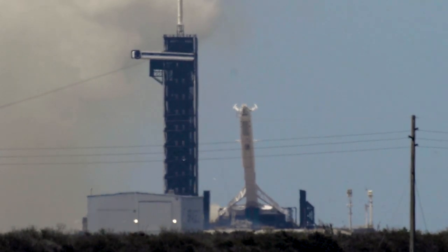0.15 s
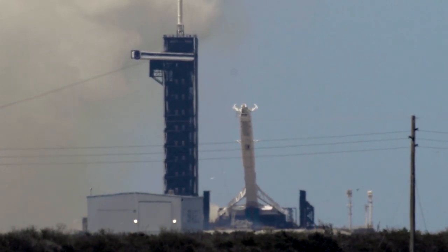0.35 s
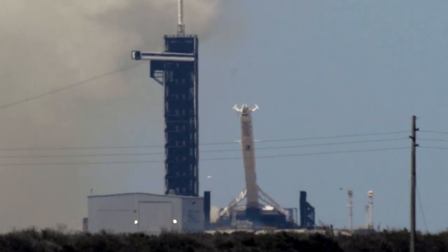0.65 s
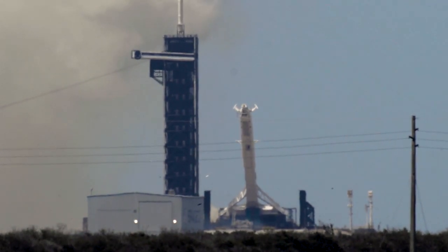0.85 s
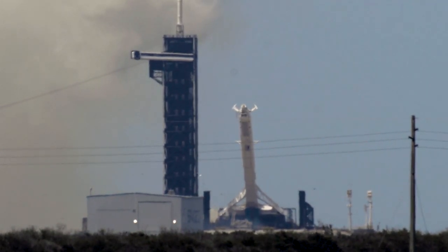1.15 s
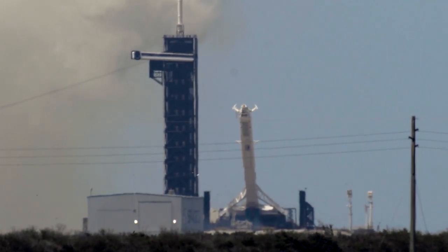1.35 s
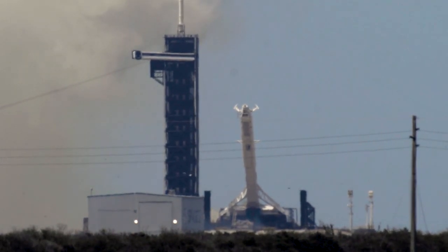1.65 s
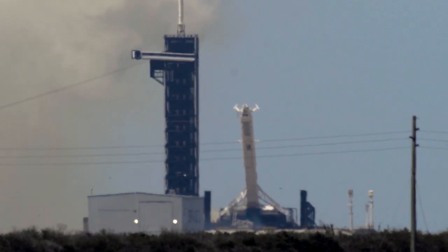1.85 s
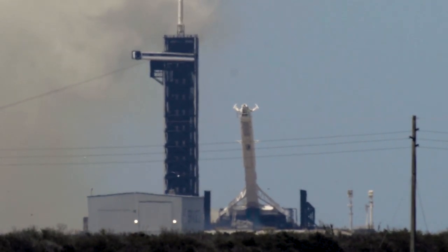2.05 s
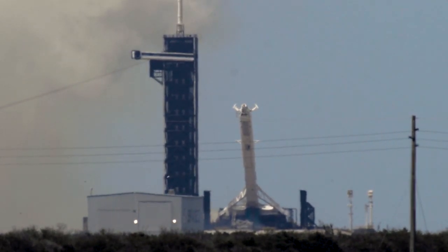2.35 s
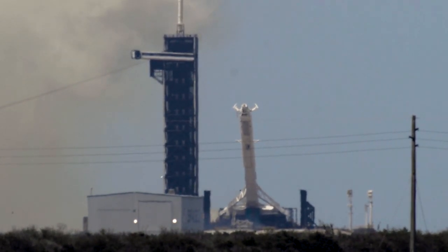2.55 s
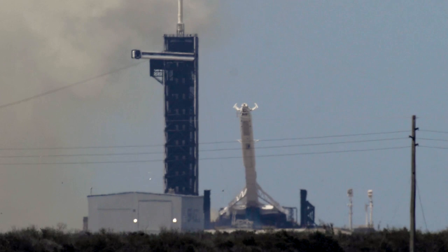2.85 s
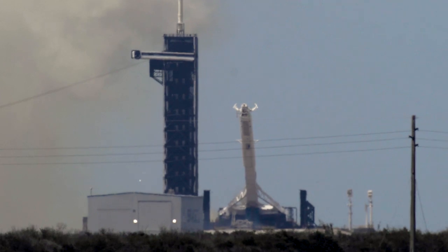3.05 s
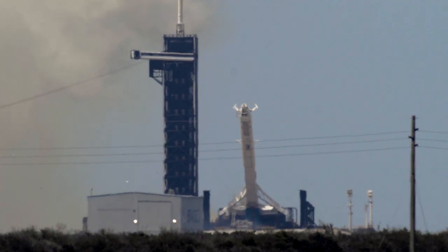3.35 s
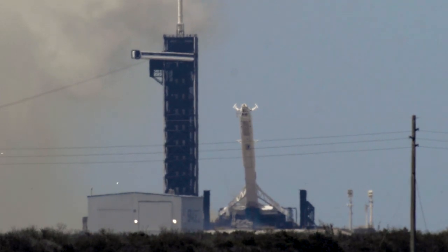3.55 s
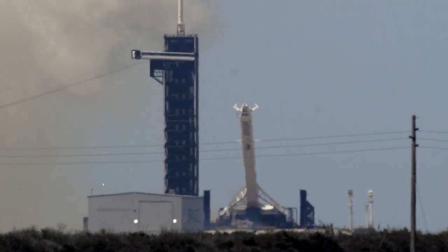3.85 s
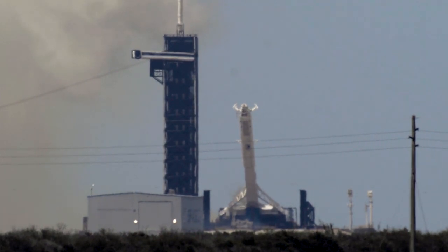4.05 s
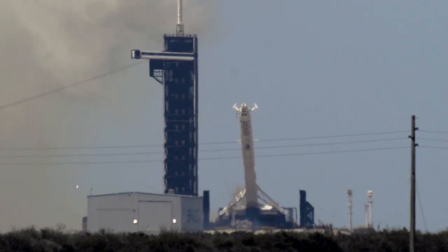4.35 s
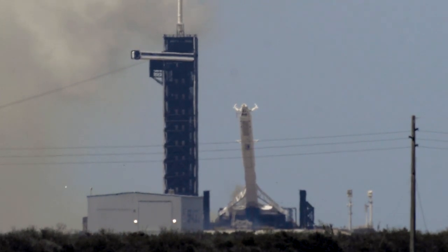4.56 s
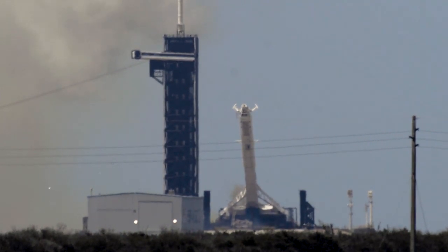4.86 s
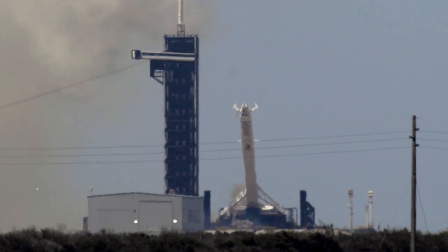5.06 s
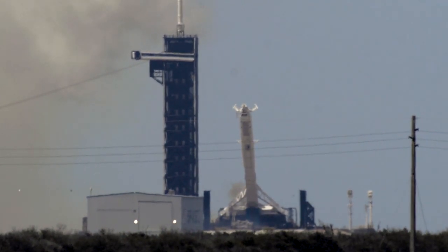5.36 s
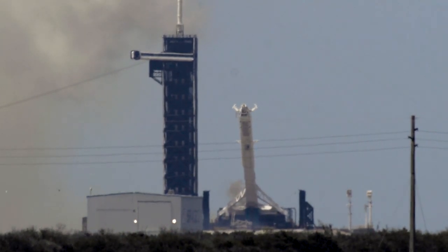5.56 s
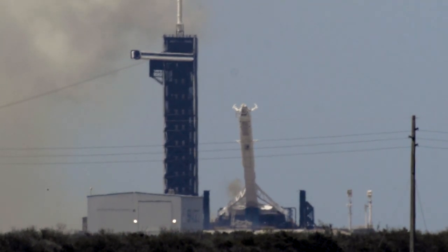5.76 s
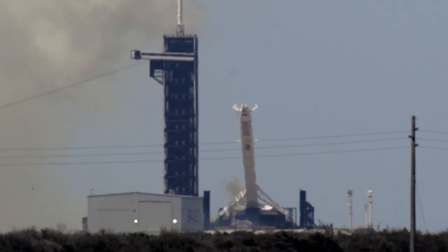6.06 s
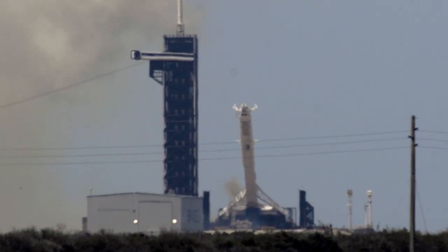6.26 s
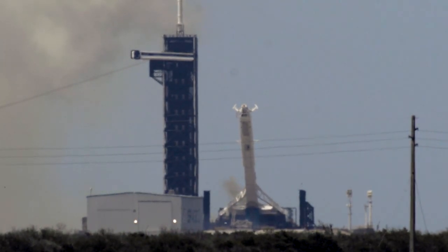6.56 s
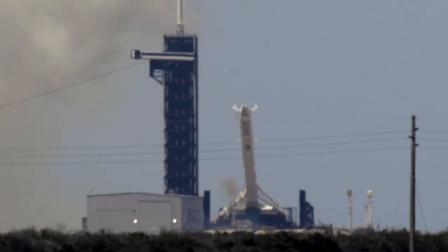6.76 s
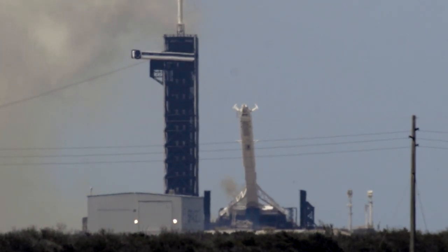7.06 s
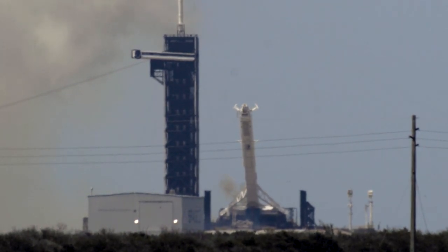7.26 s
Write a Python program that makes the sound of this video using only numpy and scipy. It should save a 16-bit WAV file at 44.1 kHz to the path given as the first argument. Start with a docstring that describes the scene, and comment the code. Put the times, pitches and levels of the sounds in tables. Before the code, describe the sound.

Across flat scrubland, a distant microphone picks up rocket noise already in full flow: low turbulent rumble beneath popping, ripping crackle, many jolts each second. It thickens early, recedes in the middle into muffled thuds, then returns with tight, loud cracks and gritty fizz, still going at the cut. A few very faint high chips hide underneath.

```python
"""Rocket climbing away, heard from miles off

A rocket leaves its pad across flat scrubland. The jet's steepened pressure waves arrive as relaxing
jumps: steep ones crack, rounded ones thud. Each is echoed by the ground and by filtered-noise scatter
from the brush. Noise rumble and roar, a patter of weak shocks, fizz and a few high chips fill in."""
import sys
import numpy as np
from scipy import signal
from scipy.fft import rfft, irfft, next_fast_len
from scipy.io import wavfile

SR = 44100
rng = np.random.default_rng(int(sys.argv[2]) if len(sys.argv) > 2 else 0)


def wav_record(signal):
    """Record a signal, one row per channel, as 16-bit PCM in the file named by sys.argv[1]."""
    frames = np.transpose(np.atleast_2d(signal))
    bounded = np.clip(frames, -1, 1)
    # unit amplitude maps onto the largest positive 16-bit level
    quanta = np.round(bounded * 32767).astype(np.int16)
    wavfile.write(sys.argv[1], SR, quanta)


N = 326763

# Shocks that stand out as cracks and thuds. Each row: start in seconds, front level in dB before the
# mix trim, rise time in ms, swing level in dB, time of deepest suction after the front in ms.
CRACKS = [(0.0189, -11, 0.4, -23, 5.8), (0.073, -6, 0.16, -17.5, 7.4), (0.139, -8.5, 0.29, -25, 7.8),
          (0.1825, -17.5, 0.31, -22.5, 6.2), (0.2202, -22, 0.43, -32, 7.2), (0.2662, -20, 0.39, -26.5, 8.2),
          (0.281, -15, 0.43, -26, 6.5), (0.339, -9.5, 0.38, -24, 10.6), (0.382, -13.5, 0.2, -18.5, 5.7),
          (0.4097, -9.5, 0.36, -23.5, 13.3), (0.43, -14, 0.21, -19.5, 7.7), (0.5177, -10.5, 0.28, -20, 9.7),
          (0.5646, -10.5, 0.25, -20, 8.8), (0.609, -8.5, 0.35, -27, 9.4), (0.6827, -15.5, 0.24, -23, 7.6),
          (0.7265, -10.5, 0.28, -24, 8.7), (0.8003, -11, 0.36, -27, 8.8), (0.8554, -14.5, 0.29, -26.5, 8.2),
          (0.874, -13, 0.44, -23, 7.7), (0.9, -11.5, 0.37, -26.5, 7.7), (0.9287, -12, 0.33, -22, 9.2),
          (0.9608, -16, 0.36, -20.5, 6.6), (1.017, -9, 0.21, -21.5, 6.9), (1.0553, -30, 0.31, -24, 8.9),
          (1.1093, -14, 0.29, -21, 7.4), (1.1308, -12, 0.22, -20, 6.2), (1.16, -8, 0.54, -21, 6.5),
          (1.1943, -7.5, 0.2, -20, 7), (1.2371, -16.5, 0.28, -25, 6.8), (1.265, -13, 0.38, -30, 11),
          (1.2822, -13.5, 0.36, -21, 6.4), (1.3264, -10, 0.34, -20, 7.4), (1.3568, -20, 0.64, -19.5, 8.4),
          (1.389, -13, 0.22, -19, 7.1), (1.4375, -7.5, 0.16, -16.5, 8.2), (1.462, -12, 0.29, -18.5, 6.3),
          (1.5074, -12.5, 0.28, -18, 8.9), (1.5663, -6.5, 0.13, -15, 9.2), (1.614, -8, 0.25, -17.5, 8.5),
          (1.6426, -8, 0.19, -16.5, 8.7), (1.6821, -16, 0.23, -23, 11), (1.749, -3.5, 0.08, -16.5, 6.2),
          (1.7901, -3, 0.34, -21.5, 11.4), (1.8326, -9.5, 0.44, -23, 21), (1.867, -10.5, 0.22, -17, 8.7),
          (1.883, -18.5, 0.26, -27, 7.6), (1.913, -6.5, 0.25, -17, 7.9), (1.9558, -8.5, 0.25, -23.5, 6.6),
          (2.0172, -11.5, 0.32, -20.5, 8), (2.0319, -18.5, 0.27, -19.5, 7), (2.077, -10.5, 0.27, -16, 6.9),
          (2.1174, -12.5, 0.27, -25, 13.6), (2.1959, -6, 0.22, -14.5, 6.9), (2.252, -11.5, 0.27, -16, 7.5),
          (2.2961, -10.5, 0.44, -25, 6.3), (2.3279, -6.5, 0.16, -16.5, 6.2), (2.3476, -12, 0.34, -20, 8.9),
          (2.39, -25, 0.39, -23.5, 9.7), (2.4135, -6.5, 0.15, -17.5, 6), (2.4229, -10.5, 0.25, -17.5, 6.9),
          (2.461, -19, 0.22, -27, 7.9), (2.4836, -10, 0.35, -26.5, 10.5), (2.5087, -7.5, 0.25, -23.5, 7),
          (2.55, -10, 0.35, -25.5, 6.5), (2.5962, -13, 0.26, -32, 4.3), (2.6036, -8, 0.37, -23.5, 8.2),
          (2.631, -13.5, 0.4, -24, 6.6), (2.6506, -11.5, 0.45, -29, 7.7), (2.699, -6.5, 0.19, -15.5, 7.1),
          (2.7353, -13, 0.28, -20, 9.6), (2.786, -7, 0.24, -18, 8.9), (2.812, -8, 0.28, -21, 9.6),
          (2.872, -10, 0.37, -20, 11.8), (2.9266, -3.5, 0.13, -17, 7.1), (2.989, -10.5, 0.37, -27, 7.5),
          (3.033, -10.5, 0.26, -32, 6.2), (3.0845, -11.5, 0.23, -22, 9), (3.1274, -12, 0.28, -23, 7.9),
          (3.1662, -5.5, 0.16, -20.5, 7.9), (3.2206, -13, 0.24, -28.5, 6.3), (3.2416, -8.5, 0.58, -24.5, 7),
          (3.262, -16, 0.41, -31.5, 5.1), (3.2905, -9, 0.23, -20.5, 8.5), (3.325, -10.5, 0.25, -29, 11),
          (3.3453, -10, 0.31, -27, 8), (3.3728, -8.5, 0.25, -24, 11.5), (3.485, -8.5, 0.42, -25, 7.5),
          (3.5303, -7, 0.32, -20.5, 9), (3.5715, -11, 0.17, -20.5, 6.2), (3.6094, -14, 0.27, -27, 7.6),
          (3.6298, -11, 0.37, -24, 6.3), (3.6628, -12, 0.17, -23.5, 6.8), (3.7061, -10.0, 0.12, -19.5, 6.1),
          (3.7345, -13, 0.28, -21.5, 8.5), (3.772, -22.5, 0.25, -24, 9), (3.8156, -9, 0.1, -15, 6),
          (3.8607, -13, 0.16, -22, 9.1), (3.9189, -12, 0.21, -19, 6), (3.954, -15, 0.16, -24, 5),
          (4.0062, -13, 0.2, -22, 9.9), (4.046, -21, 0.27, -32, 8.4), (4.1215, -12.5, 0.23, -24.5, 12),
          (4.1636, -11.5, 0.28, -24.5, 8), (4.1759, -10.5, 0.19, -21, 6.1), (4.2109, -12.5, 0.25, -22, 7.3),
          (4.2758, -14, 0.26, -22.5, 6.8), (4.3415, -13.5, 0.2, -23.5, 5.5),
          (4.3874, -8.5, 0.2, -23.5, 8.7), (4.5008, -20, 0.22, -27, 7.1), (4.5267, -15.5, 0.6, -23.5, 6.8),
          (4.5859, -10.5, 0.57, -30, 15), (4.6125, -14, 0.36, -24, 6.8), (4.6399, -12, 0.21, -24.5, 7.8),
          (4.65, -19.5, 0.32, -27, 7), (4.7835, -17, 0.36, -27, 9.2), (4.8381, -16.5, 0.39, -23, 8.5),
          (4.8768, -12.5, 0.43, -28, 9.6), (4.9551, -16, 0.44, -31.5, 6.3), (4.993, -12.5, 0.39, -30, 13),
          (5.036, -13.5, 0.46, -34, 8.3), (5.083, -16.5, 0.35, -24, 6.7), (5.1861, -10, 0.74, -30, 14.3),
          (5.379, -12, 0.56, -27.5, 9), (5.4305, -17.5, 0.42, -31, 8.9), (5.4609, -13.5, 0.3, -23, 9.5),
          (5.4976, -12.5, 0.24, -22.5, 8.2), (5.5616, -19, 0.4, -24.5, 12.7),
          (5.646, -15, 0.28, -26.5, 9.1), (5.7074, -18.5, 0.34, -32, 7.5), (5.727, -16, 0.32, -28, 10.2),
          (5.7575, -16.5, 0.39, -32, 9.3), (5.768, -14, 0.36, -26, 7.2), (5.7928, -15, 0.43, -37, 7.5),
          (5.8383, -14, 0.26, -28, 8.8), (5.859, -13, 0.14, -26.5, 6.5), (5.8791, -12, 0.2, -30, 11.5),
          (5.9297, -12, 0.14, -31, 11.7), (5.965, -11.5, 0.14, -23.5, 7.3), (6.0124, -14, 0.28, -36.5, 5.3),
          (6.0355, -19.5, 0.3, -37, 6), (6.0949, -12.5, 0.14, -33.5, 7), (6.143, -12, 0.24, -30.5, 12),
          (6.2169, -11.5, 0.19, -22, 12.4), (6.277, -12.5, 0.25, -24.5, 10.5),
          (6.3205, -16, 0.26, -26.5, 9), (6.3509, -8, 0.45, -32, 7.1), (6.3764, -13.5, 0.29, -24, 9.6),
          (6.4025, -16, 0.45, -25, 10.7), (6.441, -17, 0.3, -24.5, 9.5), (6.468, -15, 0.23, -19.5, 7.5),
          (6.5025, -16, 0.28, -35, 3.7), (6.532, -13, 0.17, -28.5, 6), (6.5469, -5, 0.49, -33, 8.5),
          (6.578, -9.5, 0.15, -21, 7.6), (6.6087, -8.5, 0.15, -25, 5.4), (6.6194, -4.5, 0.14, -25, 6.7),
          (6.6507, -10, 0.33, -24, 7.8), (6.663, -8, 0.13, -20, 5.5), (6.6787, -12, 0.11, -25, 6.4),
          (6.7, -5, 0.3, -24, 8.7), (6.737, -11, 0.097, -25, 3.9), (6.764, -12, 0.28, -30, 4.2),
          (6.7795, -4, 0.14, -25.5, 7.2), (6.8034, -12, 0.12, -26, 9.1), (6.8316, -1.5, 0.17, -22, 7.8),
          (6.8667, -15, 0.094, -29, 7.1), (6.8813, -9, 0.12, -26, 4.9), (6.8887, -7.5, 0.16, -35, 6.6),
          (6.922, -5.5, 0.29, -38, 13), (6.948, -4, 0.13, -28, 6.6), (6.966, -2.5, 0.3, -28, 11),
          (7.006, -3, 0.16, -24.5, 7.9), (7.068, -14, 0.23, -28, 4.9), (7.1329, 1, 0.16, -22.5, 7.2),
          (7.1844, -7.5, 0.29, -33, 1.3), (7.229, -11, 0.28, -31, 4.3), (7.2476, -12.5, 0.36, -24, 10.4),
          (7.284, -4, 0.27, -27.5, 5.1), (7.334, -12, 0.41, -29, 9.7)]
# Level of the jet noise. Each row: time in seconds, rumble in dB, roar in dB, both before trims.
JET_LEVELS = [(0.0, -24.5, -32.5), (0.398, -30, -41), (0.7, -27, -42), (1.05, -25.5, -41),
              (1.3, -28, -43.5), (1.5, -27, -39), (2.101, -28, -41.5), (2.55, -27, -40),
              (3.2, -29.5, -42.5), (3.8, -29.5, -40), (4.2, -30, -41.5), (4.75, -35.5, -45),
              (5.301, -32, -46), (5.7, -35.5, -45), (6.1, -30.5, -45), (6.4, -30.5, -42), (6.799, -30, -39),
              (7.41, -30.5, -40)]
# Spectrum of sizzle and wisps. Each row: frequency in Hz, relative density in dB per Hz.
FIZZ_SPECTRUM = [(1100, -20), (2400, -2), (4000, -2.5), (5200, -6.5), (6100, -24.5), (9800, -30.5),
                 (11500, -46)]


def from_db(db):
    """Decibels to gain."""
    return 10 ** (np.asarray(db) / 20)


def rms_one(x):
    """Scale to unit rms."""
    return x / np.sqrt(np.mean(x ** 2) + 1e-20)


def in_time(rows):
    """Each column of a curve, interpolated at every sample."""
    s, *columns = np.transpose(rows)
    return [np.interp(np.arange(N) / SR, s, column) for column in columns]


def noise(spectrum, size):
    """Gaussian noise of rms 1, its spectrum interpolated over log frequency."""
    hz, db = np.transpose(spectrum)
    bins_hz = np.maximum(np.fft.rfftfreq(size, 1 / SR), 1)
    gain = from_db(np.interp(np.log(bins_hz), np.log(hz), db))
    return rms_one(irfft(rfft(rng.standard_normal(size)) * gain, size))


def long_noise(spectrum):
    """Shaped noise for the whole scene."""
    return noise(spectrum, next_fast_len(N))[:N]


def ragged(size, spread_db, grain_s):
    """A gain of rms 1 that moves to a new random level at each grain."""
    step = max(grain_s * SR, 2)
    db = spread_db * np.clip(rng.standard_normal(size // 2 + 2), -2, 2)
    return rms_one(from_db(np.interp(np.arange(size) / step, np.arange(len(db)), db)))


def add(out, s, sound):
    """Mix a sound in at time s."""
    start = int(np.clip(round(s * SR), 0, N - 1))
    out[start:start + len(sound)] += sound[:N - start]


def bell(hz, width_hz, db):
    """Coefficients of one resonant peak or dip."""
    gain = from_db(db / 2)
    half = np.tan(np.pi * width_hz / SR)
    turn = -2 * np.cos(2 * np.pi * hz / SR)
    return [1 + half * gain, turn, 1 - half * gain], [1 + half / gain, turn, 1 - half / gain]


def sliding_bell(x, hz, db, breadth, block=256):
    """A peak or dip whose pitch and height move, updated block by block."""
    out, state = np.zeros(N), np.zeros(2)
    for i in range(0, N, block):
        b, a = bell(hz[i], breadth * hz[i], db[i])
        out[i:i + block], state = signal.lfilter(b, a, x[i:i + block], zi=state)
    return out


def air_hiss(level_db=-101.5):
    """Faint, even white noise."""
    return from_db(level_db) * rng.standard_normal(N)


def chips(attack_s=0.0039, t60_s=0.089):
    """Thin high chips, perhaps of a small bird: narrow, airy noise ticks that decay exponentially."""
    # Each row: start in seconds, pitch in Hz, level in dB.
    chip_rows = [(0.454, 5050, -68.5), (0.889, 5070, -68.5), (4.184, 5100, -76), (5.160, 4620, -86)]
    # Each row: multiple of the pitch, relative density in dB per Hz.
    chip_spectrum = [(.5, -39), (.7, -5), (.88, -10.5), (1, -3), (1.14, -10.5), (1.4, -25.5), (1.8, -16),
                     (2.15, -32), (2.5, -38)]
    t = np.arange(SR // 8) / SR
    shape = (1 - np.exp(-t / attack_s)) ** 2 * from_db(-60 * t / t60_s)
    shape = shape / shape.max()
    out = np.zeros(N)
    for s, pitch_hz, db in chip_rows:
        spectrum = [(multiple * pitch_hz, density_db) for multiple, density_db in chip_spectrum]
        add(out, s, from_db(db) * shape * noise(spectrum, len(t)))
    return out


def wisps():
    """Grainy swells of treble noise, from brief wisps to long spells of tearing."""
    # Each row: centre in seconds, width in seconds, peak level in dB.
    wisp_rows = [(0.040, 0.012, -74), (1.649, 0.36, -72), (3.8, 0.2, -82.5), (6.80, 0.13, -77.5),
                 (7.110, 0.013, -66), (7.239, 0.013, -57)]
    level = np.zeros(N)
    for s, width_s, db in wisp_rows:
        widths = np.clip((np.arange(N) / SR - s) / width_s * 2, -20, 20)
        level = np.hypot(level, from_db(db) / np.cosh(widths))
    return level * ragged(N, spread_db=9.0, grain_s=0.0044) * long_noise(FIZZ_SPECTRUM)


def rumble(level_db, trim_db=-6):
    """The jet's low turbulence: shaped noise of lumpy level."""
    # Each row: frequency in Hz, relative density in dB per Hz.
    rumble_spectrum = [(12, -12.5), (25, -1.5), (45, 9), (70, 1), (100, 5.5), (140, -15), (220, -41),
                       (500, -75.5)]
    return from_db(level_db + trim_db) * ragged(N, spread_db=3.0, grain_s=0.041) * long_noise(rumble_spectrum)


def roar(level_db, trim_db=-0.5):
    """The merged roar of the jet: shaped noise of lumpy level."""
    # Each row: frequency in Hz, relative density in dB per Hz.
    roar_spectrum = [(60, -17.5), (130, 15), (190, -2.5), (300, -9), (500, -14.5), (800, -23),
                     (1200, -31.5), (2000, -41), (4000, -57.5), (8000, -70.5)]
    return from_db(level_db + trim_db) * ragged(N, spread_db=2.0, grain_s=0.018) * long_noise(roar_spectrum)


def front(t, rise_ms, relax_ms=0.56, soften=0.34, round_ms=0.072):
    """A jump of pressure that relaxes at once; absorption rounds its edge, weak fronts the most."""
    ms = t * 1000
    wave = np.exp(-ms / relax_ms)
    extra_lag_ms = soften * rise_ms * np.tanh((rise_ms / round_ms) ** 2)
    for lag_ms in (0.88 * rise_ms, 0.88 * rise_ms, extra_lag_ms):
        r = np.exp(-ms[1] / max(lag_ms, ms[1] / 10))
        wave = signal.lfilter([1 - r], [1, -r], wave)
    return wave


def swing(t, suction_ms, onset_ms=0.81):
    """Push, suction and a faint long trailing suction behind a front, stretched to the shock's length."""
    # Push, suction, trailing suction. Each row: time after the front in ms, half width in ms (both
    # before stretching), relative height.
    swing_lobes = [(2.27, 2.15, 0.77), (7.73, 2.99, -1.37), (21, 6.5, -0.16)]
    ms = t * 1000 * swing_lobes[1][0] / max(suction_ms, 2)
    lobes = sum(height * np.exp(-((ms - at_ms) / width_ms) ** 2) for at_ms, width_ms, height in swing_lobes)
    return lobes * (1 - np.exp(-(ms / onset_ms) ** 2))


def scatter(t, near_db=-8.0, near_t60_s=0.027, near_build_s=0.003,
            far_db=-15, far_t60_s=0.28, far_build_s=0.0019):
    """A new noise echo pattern per call: a spray from nearby brush, then a ragged wash from the field."""
    # Each row: frequency in Hz, relative density in dB per Hz.
    brush_spectrum = [(60, -16.5), (200, -4.5), (500, 3.5), (1200, 2.5), (2500, 8.5), (4800, 7), (6200, -7),
                      (9500, -2.5), (15000, -18.5)]
    near = from_db(-60 * t / near_t60_s) * (1 - np.exp(-t / near_build_s)) ** 2
    far = from_db(-60 * t / far_t60_s) * (1 - np.exp(-t / far_build_s))
    shape = np.hypot(from_db(near_db) * rms_one(near), from_db(far_db) * rms_one(far))
    grit = ragged(len(t), spread_db=5.5, grain_s=0.002)
    return shape * grit * noise(brush_spectrum, len(t)) / np.sqrt(len(t))


def weak_shocks(per_s=55, spread_db=3.0, rise_ms=0.55, low_hz=130):
    """Small rounded shocks arriving at random, trailed by scattered echoes; rms 1."""
    t = np.arange(SR // 8) / SR
    sizes = from_db(spread_db * np.clip(rng.standard_normal(N), -2, 1))
    arrivals = sizes * (rng.random(N) < per_s / SR)
    waves = signal.fftconvolve(arrivals, front(t, rise_ms, soften=0.14))[:N]
    waves = waves + signal.fftconvolve(waves, scatter(t))[:N]
    high_pass = signal.butter(2, low_hz, "high", fs=SR, output="sos")
    return rms_one(signal.sosfilt(high_pass, waves))


def lesser_shocks(per_s=23.4, jitter=0.22, over_roar_db=22.5, spread_db=3.5, ref_rise_ms=0.52,
                  ref_db=-19, rise_doubling_db=17.5, swing_follows=0.18, swing_trim_db=-1.5):
    """Rows like those of CRACKS, filling the gaps between them; levels follow the roar.

    Rise time doubles for every rise_doubling_db below ref_db; jitter is a share of the interval."""
    crack_s, crack_db, _, crack_swing_db, crack_suction_ms = np.transpose(CRACKS)
    marks = [0, *crack_s, N / SR]
    times = []
    for start, end in zip(marks, marks[1:]):
        intervals = max(round((end - start) * per_s), 1)
        times.extend(np.linspace(start, end, intervals + 1)[1:-1])
    late, size = np.clip(rng.standard_normal((len(times), 2)), -2, 2).T
    s = np.array(times) + late * jitter / per_s
    jet_s, _, roar_db = np.transpose(JET_LEVELS)
    db = np.interp(s, jet_s, roar_db) + over_roar_db + spread_db * size
    rise_ms = ref_rise_ms * 2 ** ((ref_db - db) / rise_doubling_db)
    # stronger fronts pull a deeper swing: swing_follows is dB of swing per dB of front
    base_swing_db = np.interp(s, crack_s, crack_swing_db - swing_follows * crack_db)
    swing_db = base_swing_db + swing_follows * db + swing_trim_db
    return list(zip(s, db, rise_ms, swing_db, np.interp(s, crack_s, crack_suction_ms)))


def crackle(front_db=-2.5, fold_db=-15, fold_s=0.006, refold_db=-21, refold_s=0.015,
            foot_db=-17, foot_s=0.0004, lead_s=0.0036):
    """Cracks and lesser shocks: sharp fronts with scattered echoes, and the slow swings apart."""
    t = np.arange(SR // 5) / SR
    brief = t[:len(t) // 5]
    cracks, swings = np.zeros(N), np.zeros(N)
    # pressure already swells just before each jump
    foot = from_db(foot_db) / np.cosh((brief - lead_s) / foot_s)
    shocks = list(CRACKS) + lesser_shocks()
    for s, jump_db, rise_ms, swing_db, suction_ms in shocks:
        late, size, later, later_size = rng.random(4)
        edge = from_db(jump_db + front_db) * front(brief, rise_ms)
        add(cracks, s, edge)
        add(cracks, s - lead_s, from_db(jump_db) * foot)
        # turbulence folds the front: two weaker copies trail it
        add(cracks, s + fold_s * (0.25 + late), 2 * size * from_db(fold_db) * edge)
        add(cracks, s + refold_s * (0.5 + later), 2 * later_size * from_db(refold_db) * edge)
        add(swings, s, from_db(swing_db) * swing(t, suction_ms))
        add(cracks, s, signal.fftconvolve(edge, scatter(t)))
    return cracks, swings


def sizzle(level_db, full_db, fall, spectrum, build_s=0.0055, t60_s=0.15, snap=6.9, snap_t60_s=0.012,
           growth_db_per_s=1.5, tail_growth_db_per_s=2.3):
    """Treble noise snap and gritty tail of steep fronts.

    Steepness is front dB less rise time in dB re 1 ms; below full_db, fall dB are lost per dB.
    level_db holds at the end of the scene. Set to grow over the scene, tails faster: early cracks
    snap drily, late ones hiss on."""
    t = np.arange(SR // 4) / SR
    snaps, tails = np.zeros(N), np.zeros(N)
    snap_shape = snap * from_db(-60 * t / snap_t60_s)
    swell = (1 - np.exp(-t / build_s)) ** 2 * from_db(-60 * t / t60_s)
    swell = swell / swell.max()
    for s, jump_db, rise_ms, *_ in CRACKS:
        shortfall_db = max(full_db - jump_db + 20 * np.log10(rise_ms), 0)
        from_end_s = s - N / SR
        strength = from_db(level_db - fall * shortfall_db + growth_db_per_s * from_end_s)
        add(snaps, s, strength * snap_shape)
        add(tails, s, strength * from_db(tail_growth_db_per_s * from_end_s) * swell)
    return (snaps + tails * ragged(N, spread_db=3.5, grain_s=0.0012)) * long_noise(spectrum)


def ground_echo(x, share=0.23, split_hz=2300, wander_ms=0.45, wander_s=0.05):
    """A late, mostly duller copy off the ground; the lag grows overall with the climb, gusts make it wander."""
    # Each row: time in seconds, mean lag in ms, gain of the echo's treble in dB.
    ground_rows = [(0, 3.8, 2.5), (1.2, 3.9, -8.5), (1.45, 3.5, -1), (1.75, 3.34, -16), (2.3, 3.7, -21),
                   (3.2, 4.3, -12), (3.85, 4.3, -10.5), (6.0, 4.77, -19), (7.4, 5.36, -8.5)]
    lag_ms, treble_db = in_time(ground_rows)
    steps = rng.uniform(-1, 1, N // 100)
    lag_ms = lag_ms + wander_ms * np.interp(np.arange(N) / SR / wander_s, np.arange(len(steps)), steps)
    dull = signal.sosfilt(signal.butter(1, split_hz, fs=SR, output="sos"), x)
    echo = share * dull + from_db(treble_db) * (x - dull)
    return np.interp(np.arange(N) - lag_ms * SR / 1000, np.arange(N), echo)


def air_path(x, dip_ratio=2.31, dip_share=0.94):
    """Paths of different length add up in one band and cancel in one above; both slide as the air changes."""
    # Each row: time in seconds, centre in Hz, height in dB.
    hump_rows = [(0, 245, 3.5), (.6, 144, 4), (1.2, 300, -1), (1.7, 316, 1), (2.1, 233, 3.5),
                 (2.42, 249, 4), (2.6, 950, 1.5), (3.0, 1030, 2.5), (3.2, 414, 2.5), (3.35, 350, 5),
                 (3.6, 297, 7), (3.9, 275, 10), (4.25, 254.6, 3.5), (5.3, 197.5, 1), (6.0, 377, 0.5),
                 (6.7, 393, 1.5), (7.05, 468, 4), (7.2, 196.8, 3.5), (7.41, 190, 9.5)]
    hz, db = in_time(hump_rows)
    humped = sliding_bell(x, hz, db, breadth=0.63)
    return sliding_bell(humped, dip_ratio * hz, -dip_share * db, breadth=1.0)


def dull_top(x, edge_hz=5400, leak_db=-23):
    """A steep low-pass: full up to about 5 kHz, only a faint leak above."""
    low_pass = signal.butter(6, min(edge_hz, 0.45 * SR), fs=SR, output="sos")
    muffled = signal.sosfiltfilt(low_pass, x)
    return muffled + from_db(leak_db) * (x - muffled)


def site_colour(x):
    """Surfaces around the microphone reinforce some bands and cancel others: a chain of bells."""
    # Each row: centre in Hz, width in Hz, height in dB.
    site_bands = [(149.7, 37, -6.5), (174, 26, 6.5), (286.5, 21, 3.5), (309, 21, -4), (504, 240, 4.5),
                  (632, 89, -8), (968, 57, -4.5), (1066, 92, 4), (1284, 250, -4.5), (1800, 100, -3.5),
                  (4900, 7500, 3), (6560, 2500, -1.5)]
    for hz, width_hz, db in site_bands:
        x = signal.lfilter(*bell(hz, width_hz, db), x)
    return x


def scene():
    """Shocks ride on the jet's rumble and lumpy roar, over a faint even hiss."""
    # Each row: frequency in Hz, relative density in dB per Hz.
    top_spectrum = [(4500, -22), (6300, -1), (9500, -6.5), (10800, -19.5), (15000, -24)]
    rumble_db, roar_db = in_time(JET_LEVELS)
    background = rumble(rumble_db) + wisps() + chips() + air_hiss()
    patter = from_db(roar_db - 2.5) * weak_shocks()
    cracks, swings = crackle()
    direct = cracks + patter + roar(roar_db)
    arriving = dull_top(air_path(direct + ground_echo(direct) + swings))
    treble = sizzle(level_db=-47.5, full_db=15.5, fall=3.1, spectrum=FIZZ_SPECTRUM)
    # only the very steepest fronts carry the top treble
    top = sizzle(level_db=-66, full_db=14, fall=5.8, spectrum=top_spectrum)
    return (site_colour(arriving) + treble + top + background)[None]


def record(dry, low_hz=12, ceiling=0.37, cutoff_hz=16400):
    """The microphone drops the infrasound, the tallest shocks are flattened, the top is cut."""
    heard = signal.sosfilt(signal.butter(1, low_hz, "high", fs=SR, output="sos"), dry)
    held = heard / (1 + (heard / ceiling) ** 8) ** (1 / 8)
    return signal.sosfilt(signal.cheby2(12, 70, cutoff_hz, fs=SR, output="sos"), held)


dry = scene()
out = record(dry)
wav_record(out)
```